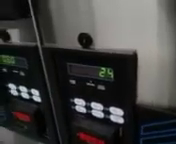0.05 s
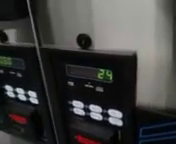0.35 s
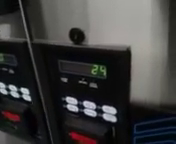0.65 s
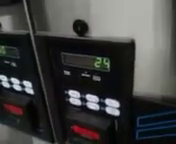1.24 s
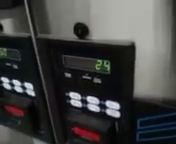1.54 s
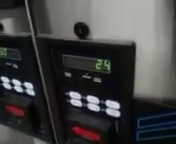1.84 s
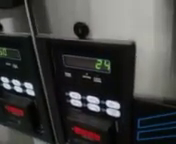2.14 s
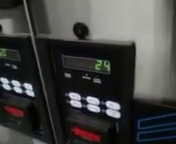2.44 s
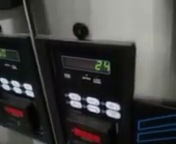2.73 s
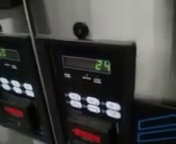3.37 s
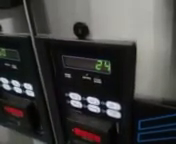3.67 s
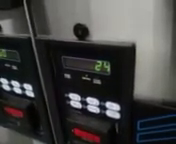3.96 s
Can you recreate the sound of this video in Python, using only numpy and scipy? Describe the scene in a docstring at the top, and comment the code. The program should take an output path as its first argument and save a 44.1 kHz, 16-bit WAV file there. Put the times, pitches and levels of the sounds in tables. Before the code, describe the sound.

Two clothes dryers run close by for all four seconds, with a low rumble, a slowly swelling hum, a wavering whine and rushing air. From about 0.4 seconds, laundry drops unevenly with soft booms, while buttons and zips tick faintly. The drum scuffs briefly near 0.9, 2.2 and 3.4 seconds. Dull, deep thuds hit the cabinet around 1.1, 2.3, 3.4 and 3.6 seconds.

```python
"""Two clothes dryers run side by side in a small laundry room, heard from close by.
Their motors turn at nearly the same speed, so the hum swells slowly and the whine beats five times
a second. Laundry tumbles in a booming drum and thuds against the cabinet, air rushes through the
ducts, buttons and zips tick faintly, and the drum scuffs its seal once a turn."""
import sys
import numpy as np
from scipy import signal
from scipy.fft import rfft, irfft
from scipy.io import wavfile
from scipy.ndimage import uniform_filter1d

SR = 44100
rng = np.random.default_rng(int(sys.argv[2]) if len(sys.argv) > 2 else 0)


def store_wav(level_fs):
    """Save 16-bit WAV to argv[1]."""
    pcm = np.round(np.clip(np.atleast_2d(level_fs), -1, 1) * 32767)
    wavfile.write(sys.argv[1], SR, pcm.T.astype(np.int16))


N = 176400
T = np.arange(N) / SR


def amp(db):
    """Decibels to gain."""
    return 10 ** (np.asarray(db) / 20)


def unit(x):
    """Scales to rms 1."""
    return x / np.sqrt(np.mean(x ** 2) + 1e-20)


def colour(x, points):
    """Equalises x with a curve of (frequency [Hz], gain [dB]) points."""
    hz, db = np.transpose(points)
    f = np.fft.rfftfreq(len(x), 1 / SR)
    return irfft(rfft(x) * amp(np.interp(np.log(f + 1), np.log(hz), db)), len(x))


def drift(rate_hz):
    """Smooth random modulation of rms 1."""
    f = np.fft.rfftfreq(N, 1 / SR)
    return unit(irfft(rfft(rng.standard_normal(N)) * np.exp(-(f / rate_hz) ** 2) * (f > 0), N))


def turbulence(points, patchy_db):
    """Coloured noise of rms 1 whose level drifts in patches of time and frequency."""
    spectra = signal.stft(rng.standard_normal(N), nperseg=512)[2].T
    patches = uniform_filter1d(rng.standard_normal(spectra.shape), size=12, axis=0)
    patches = unit(uniform_filter1d(patches, size=8, axis=1))
    noise = signal.istft((spectra * amp(patchy_db * patches)).T)[1][:N]
    return unit(colour(noise, points))


def swell(t, rise_s, decay_s):
    """Envelope with a soft attack and an exponential decay, peak 1."""
    shape = (1 - np.exp(-(t / rise_s) ** 2)) * np.exp(-t / decay_s)
    return shape / shape.max()


def motors():
    """Hum and blower whine of two motors that pass in and out of step."""
    # motor partials (shaft-rate multiple [rounded on use], first motor [dB], second motor [dB])
    partials = [(1, -24, -25), (2, -30.5, -41.5), (3, -29, -34), (8, -34.5, -34), (9, -44.5, -30),
                (18, -30, -32.5), (36, -55, -56), (48, -50, -73), (58, -60, -53), (80.8, -62, -57),
                (105, -61, -64)]
    # fader ride on the blower whine (time [s], level [dB])
    whine_ride = [(0, 2.5), (.38, 1.5), (.7, -2.5), (1.2, -1), (1.7, -.3), (2.1, 0.5), (2.8, -0.5),
                  (3.5, -1), (4, 0)]
    shaft_hz, slower_by_hz, in_step_s = 58.53, .2924, 3.2
    out = np.zeros(N)
    for motor, hz in enumerate([shaft_hz, shaft_hz - slower_by_hz]):
        turns = hz * (T - in_step_s) + .0014 * drift(5.8)  # slight shaft wobble
        for multiple, *db in partials:
            level = amp(db[motor]) * (1 + .21 * drift(40))  # flutter
            if round(multiple) == 18:  # the blower whine
                level *= amp(np.interp(T, *np.transpose(whine_ride)))
            out += level * np.sqrt(2) * np.sin(2 * np.pi * round(multiple) * turns)
    return out


def tumbling():
    """Each fall of laundry swells into the low modes of the drum, over a steady rumble."""
    # rumble of the drum and cabinet (frequency [Hz], gain [dB])
    rumble_eq = [(15, -30), (32, -34), (42, -25), (52, -12.5), (64, -11), (95, -9.5), (135, -7),
                 (150, -6.5), (159, -2.5), (168, -6), (178, -1.5), (187, -5), (202, -3.5), (245, -9.5),
                 (272, -8.5), (330, -12.5), (400, -13), (520, -19.5), (660, -18), (850, -27), (1400, -38),
                 (4000, -70)]
    # soft falls of laundry (time [s], level [dB])
    falls = [(0.411, -13), (0.619, -16), (1.031, -15), (1.22, -13.5), (1.38, -13.5), (1.9, -16.5),
             (2.16, -11.5), (2.341, -19), (2.52, -15), (2.741, -23), (3.22, -19), (3.641, -10.5),
             (3.819, -14.5)]
    # drum modes (frequency [Hz], level [dB])
    modes = [(160, 3.5), (178, -8), (203, -12), (265, -11.5)]
    out = amp(-13) * turbulence(rumble_eq, patchy_db=.2)
    for start, db in falls:
        t = np.maximum(T - start, 0)
        ring = np.zeros(N)
        for hz, mode_db in modes:
            detuned_hz = hz * rng.uniform(1, 1.02)
            ring += amp(mode_db) * np.sin(2 * np.pi * (detuned_hz * t + rng.random()))
        out += amp(db) * swell(t, rise_s=.0085, decay_s=.12) * ring
    return out


def air():
    """Air rushes through the ducts and hisses at the vents, with a slight shared flicker."""
    # body of the rushing air (frequency [Hz], gain [dB])
    rush_eq = [(200, -8.5), (700, 0), (950, -0.5), (1150, 2), (1330, -5.5), (1800, -4), (2250, -7.5),
               (2600, -10.5), (3300, -11), (4100, -16), (5200, -20), (9000, -47.5)]
    # hiss of the vents (frequency [Hz], gain [dB])
    hiss_eq = [(2000, -36), (4200, -13), (5050, -8.5), (5750, 0), (6300, -.5), (7000, .5), (8000, -8.5),
               (9000, -11.5), (11000, -21.5), (13000, -29.5), (16000, -38)]
    # fader ride on the hiss (time [s], level [dB])
    hiss_ride = [(0, 0), (.45, -0.6), (.75, 1.5), (1.0, -0.2), (1.25, 0), (1.95, 0), (2.3, 1), (2.7, 0),
                 (3.2, -0.7), (3.8, 0.5)]
    flicker = amp(.52 * drift(9.8))
    rush = amp(-24.5) * turbulence(rush_eq, patchy_db=.8)
    hiss_db = -31.5 + np.interp(T, *np.transpose(hiss_ride))
    hiss = amp(hiss_db) * turbulence(hiss_eq, patchy_db=.9)
    return flicker * (rush + hiss)


def ticks():
    """Buttons and zips tap faintly inside the drum at random moments."""
    # bright tap of fasteners on the drum (frequency [Hz], gain [dB])
    tick_eq = [(500, -27), (1800, -26), (3200, 5), (4600, 1), (6500, 6.5), (9500, -4), (12000, -14),
               (16000, -30)]
    ticks_per_s, decay_s = 12, .007
    hits = rng.random(N) < ticks_per_s / SR
    accents = amp(1.5 * np.minimum(rng.exponential(1, N), 2))
    envelope = signal.lfilter([1], [1, -np.exp(-1 / (decay_s * SR))], hits * accents)
    return amp(-46.5) * unit(colour(envelope * rng.standard_normal(N), tick_eq))


def scuffs():
    """The drum catches its seal with a dry tick, then a short rub dies away in the room."""
    # scuffs of the seal, one a turn (time [s], level [dB])
    cues = [(.875, -22), (2.155, -20.5), (3.441, -22)]
    # sharp catch that starts each scuff (frequency [Hz], gain [dB])
    catch_eq = [(2000, -16), (5000, -4), (6800, 7), (8000, -2), (9500, -15), (12500, -18), (15500, -21)]
    # the rub as the room returns it (frequency [Hz], gain [dB])
    rub_eq = [(300, -18), (1200, 10), (2000, 2), (3000, 4.5), (4300, -5.5), (6200, 6), (7800, -2),
              (9500, -18), (12000, -26), (15500, -30)]
    rise_s, hold_s, decay_s = .0044, .0054, .021
    catch_envelope, rub_envelope = np.zeros((2, N))
    for start, db in cues:
        t = np.maximum(T - start, 0)
        catch_envelope += amp(db - 1.5) * swell(t, rise_s=.0013, decay_s=.0055)
        tail = np.exp(-np.maximum(t - rise_s - hold_s, 0) / decay_s)
        rub_envelope += amp(db) * np.minimum(t / rise_s, 1) * tail
    catch = catch_envelope * unit(colour(rng.standard_normal(N), catch_eq))
    rub = rub_envelope * unit(colour(rng.standard_normal(N), rub_eq))
    return catch + rub


def thuds():
    """Heavy bundles push the cabinet panels for a few slow cycles."""
    # dull thuds against the cabinet (time [s], pitch [Hz], level [dB])
    cues = [(1.091, 61.6, -13), (2.291, 72.3, -14.5), (2.399, 81, -15.5), (3.362, 116.5, -14),
            (3.578, 84.7, -11.5)]
    out = np.zeros(N)
    for start, hz, db in cues:
        t = np.maximum(T - start, 0)
        panel = np.sin(2 * np.pi * (hz * t + rng.random()))
        out += amp(db) * swell(t, rise_s=.024, decay_s=.079) * panel
    return out


def scene():
    """Both machines in one mono mix."""
    return (motors() + tumbling() + thuds() + air() + scuffs() + ticks())[None]


def record(dry):
    """Dulls the treble in the last moments, cuts the sub-bass, rounds the peaks and trims the top."""
    dull_from_s, dull_db_per_s, dull_above_hz = 3.83, 55, 4600
    low_cut_hz, high_cut_hz = 43.6, 15700
    hz, t, spectra = signal.stft(dry, SR, nperseg=512)
    treble = 1 / (1 + (dull_above_hz / (hz + 1)) ** 3)
    spectra *= amp(-dull_db_per_s * treble[:, None] * np.maximum(t - dull_from_s, 0))
    x = signal.istft(spectra, SR)[1][:, :N]
    x = signal.sosfilt(signal.butter(6, low_cut_hz, "high", fs=SR, output="sos"), x)
    x = x / (1 + abs(x / .97) ** 8) ** (1 / 8)  # soft clip
    high_cut = signal.firwin(511, high_cut_hz, window=("kaiser", 9), fs=SR)
    return signal.oaconvolve(x, high_cut[None], "same")


dry = scene()
out = record(dry)
store_wav(out)
```